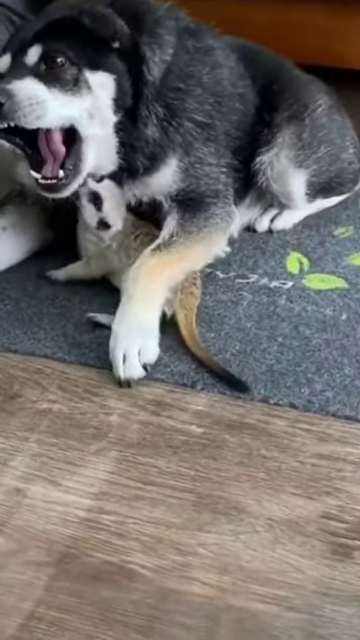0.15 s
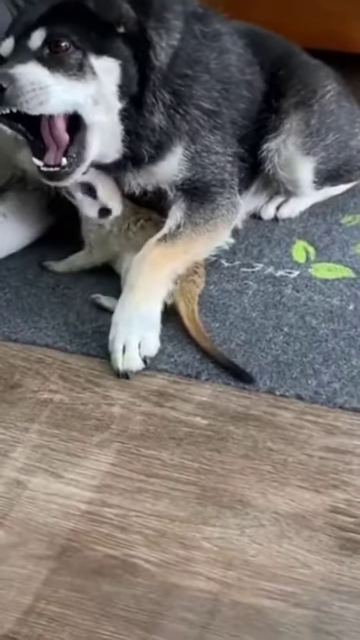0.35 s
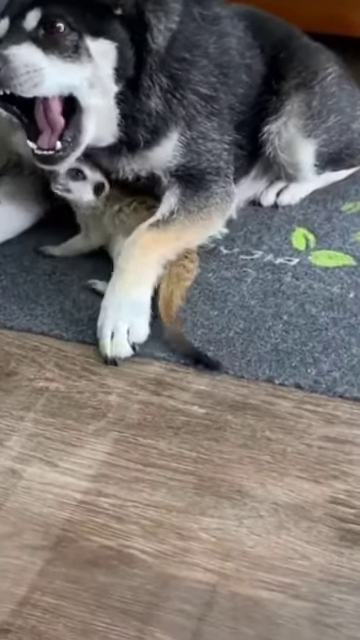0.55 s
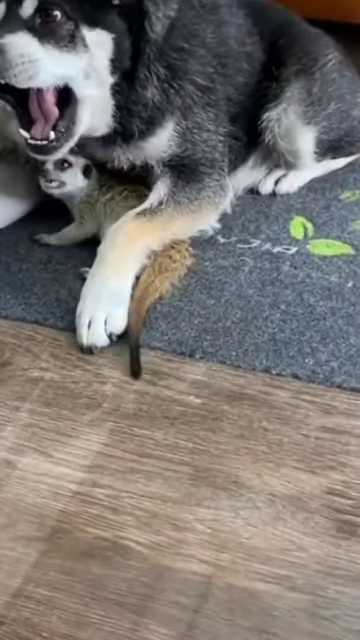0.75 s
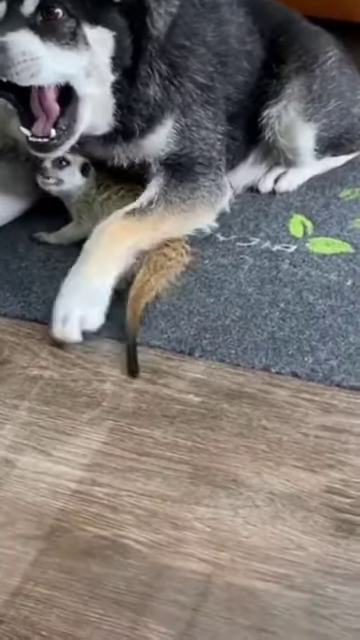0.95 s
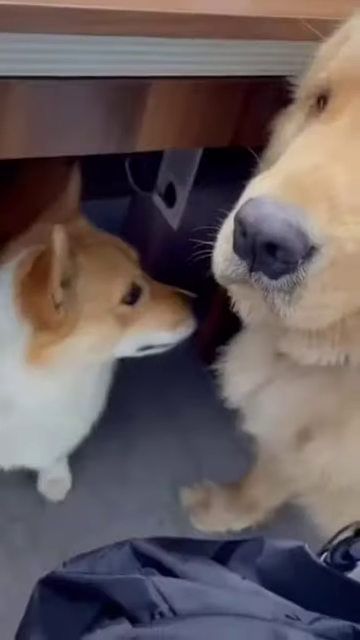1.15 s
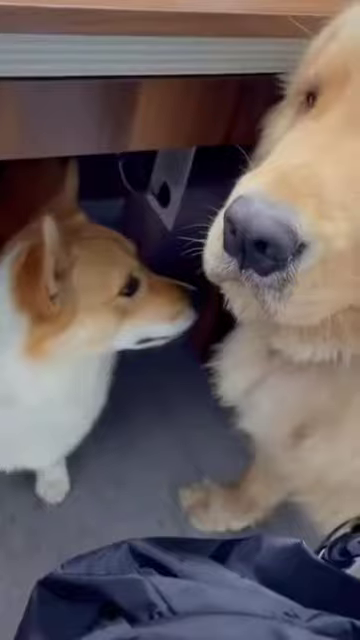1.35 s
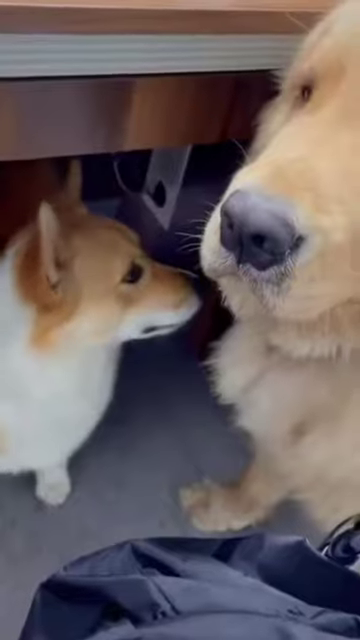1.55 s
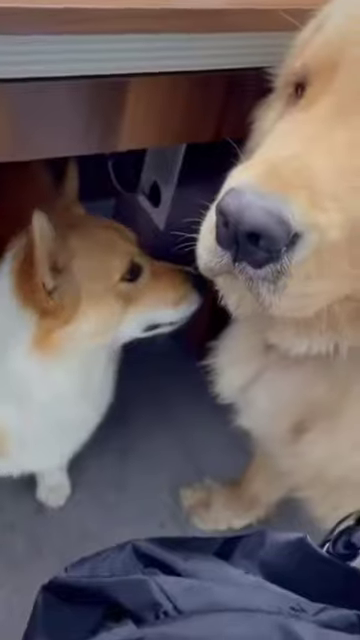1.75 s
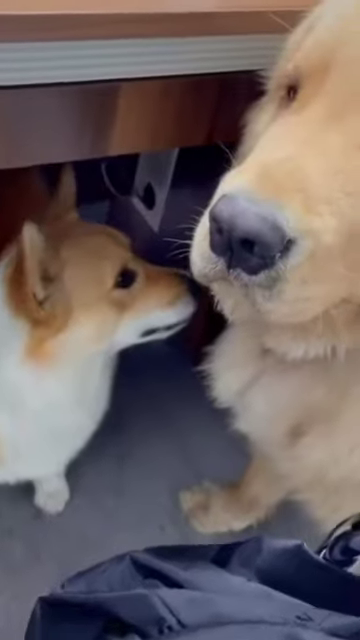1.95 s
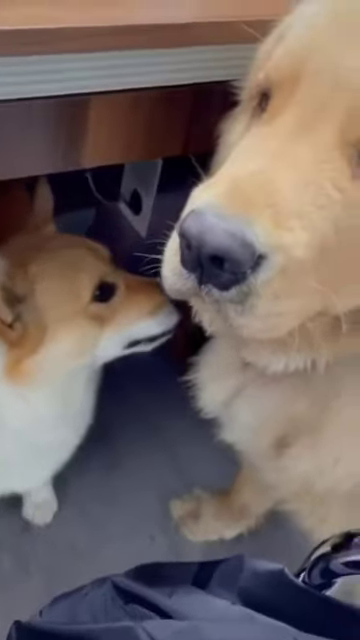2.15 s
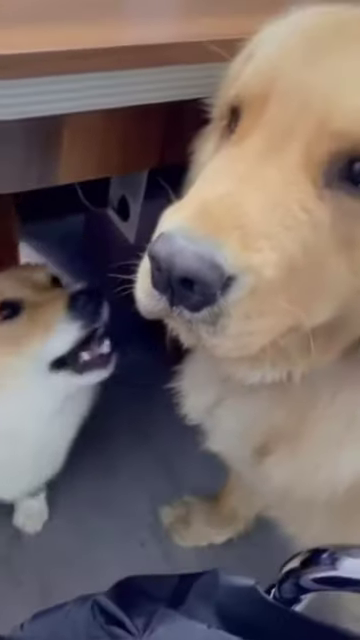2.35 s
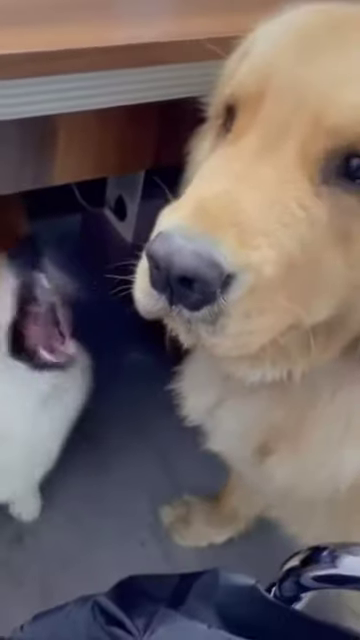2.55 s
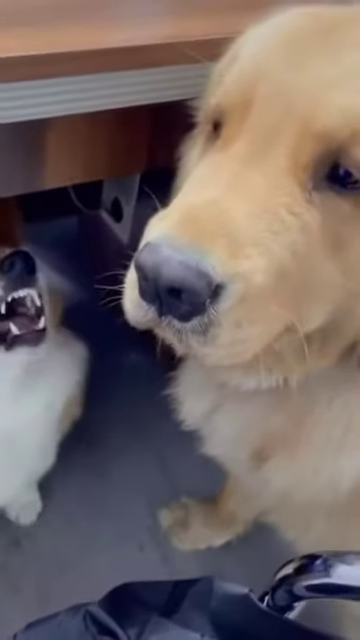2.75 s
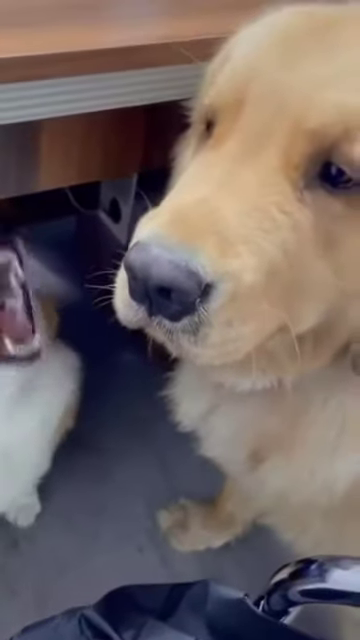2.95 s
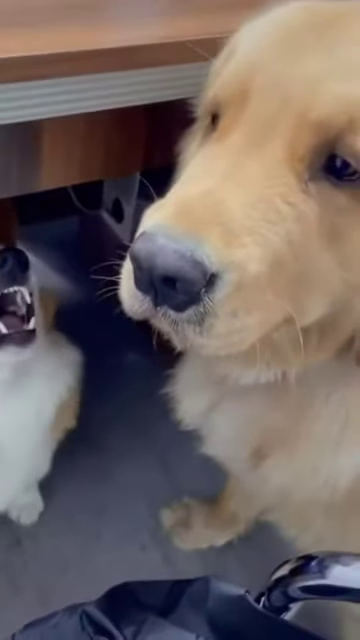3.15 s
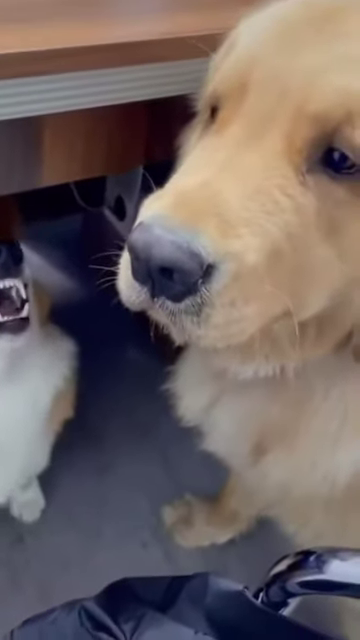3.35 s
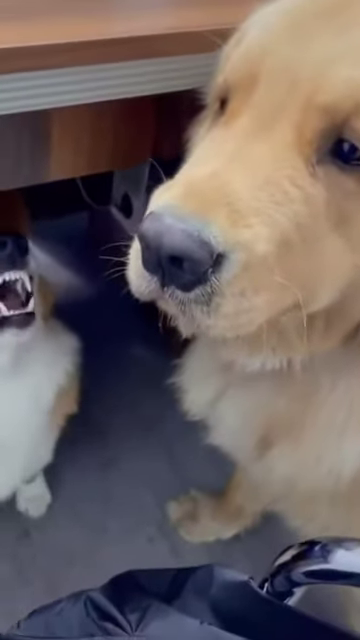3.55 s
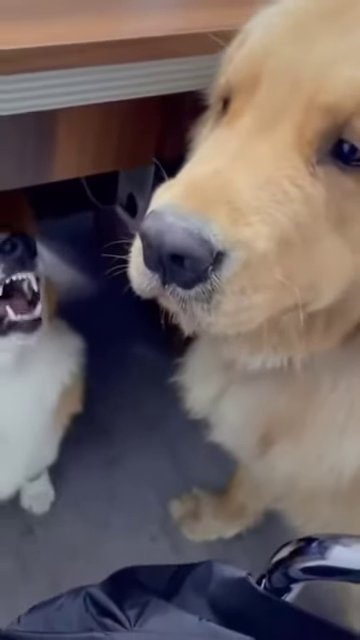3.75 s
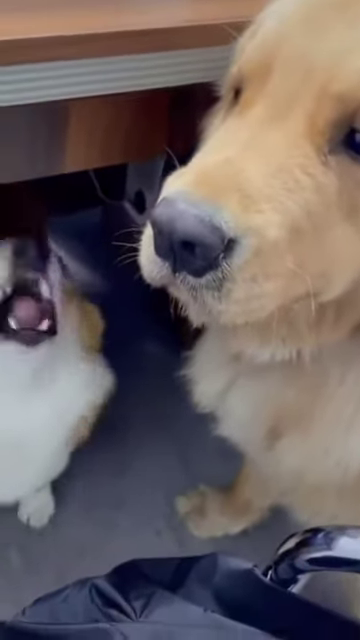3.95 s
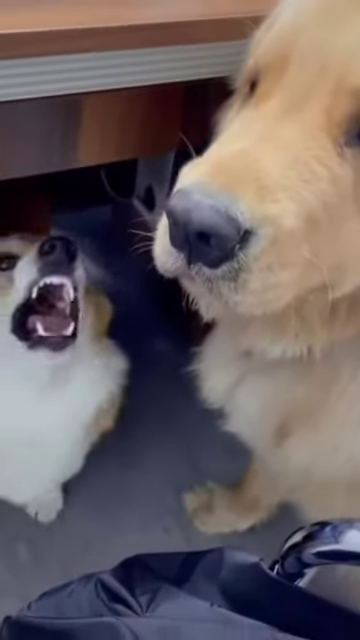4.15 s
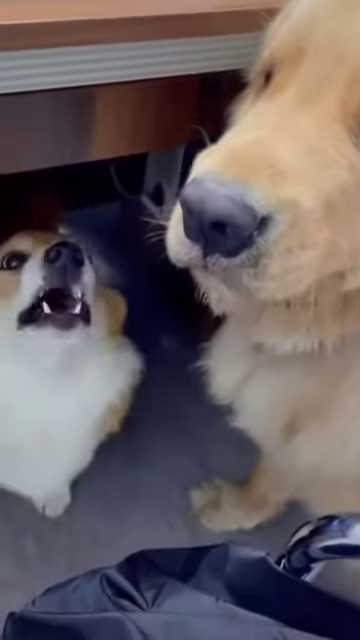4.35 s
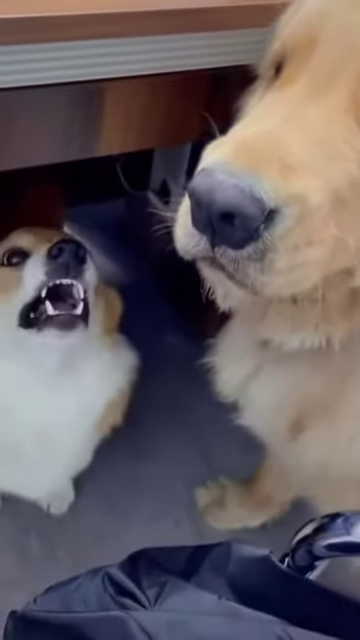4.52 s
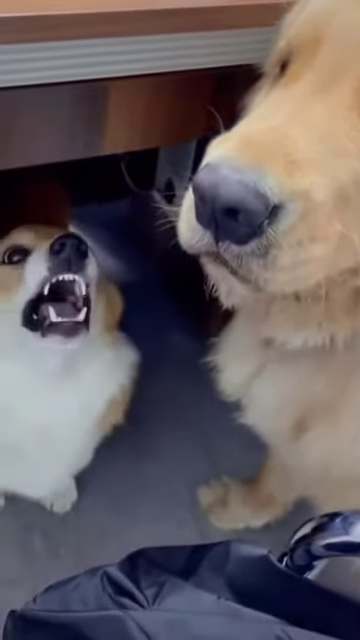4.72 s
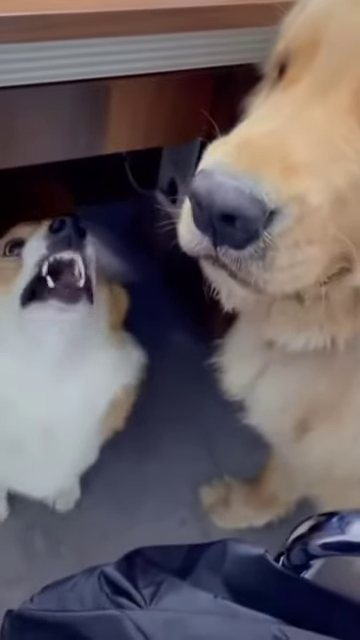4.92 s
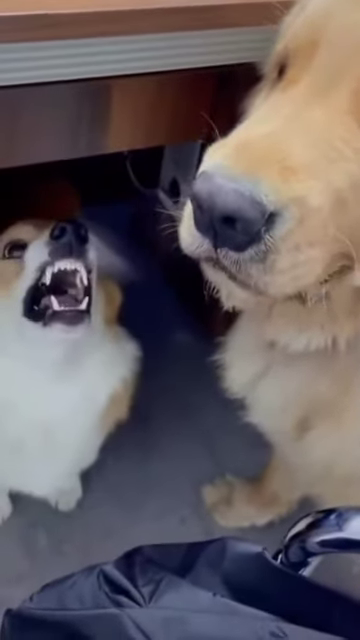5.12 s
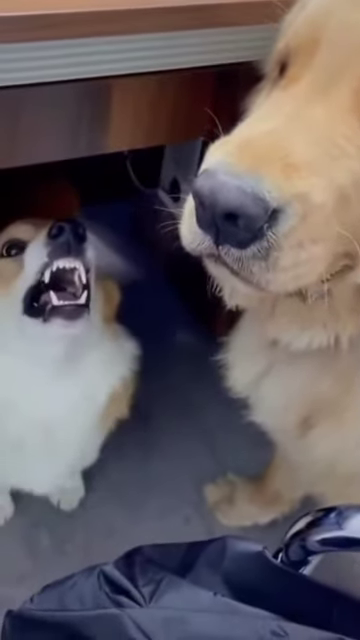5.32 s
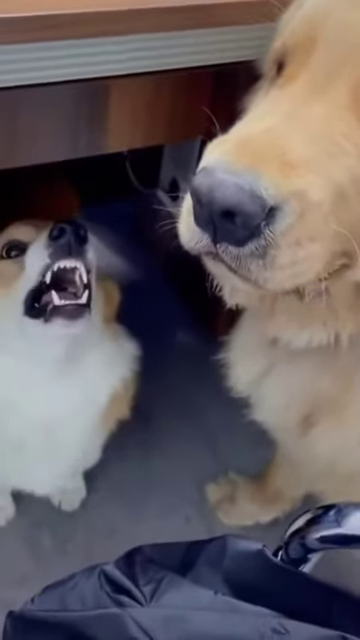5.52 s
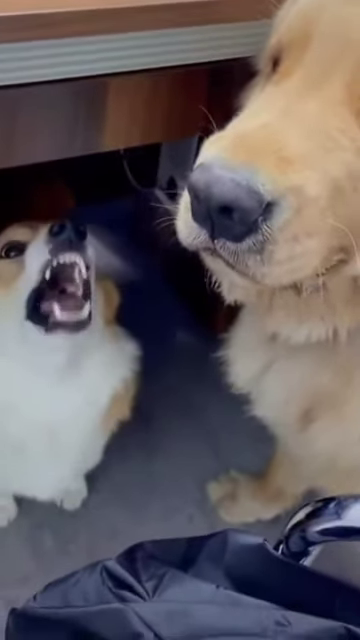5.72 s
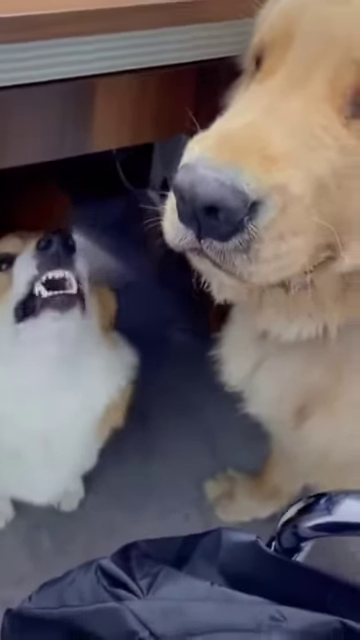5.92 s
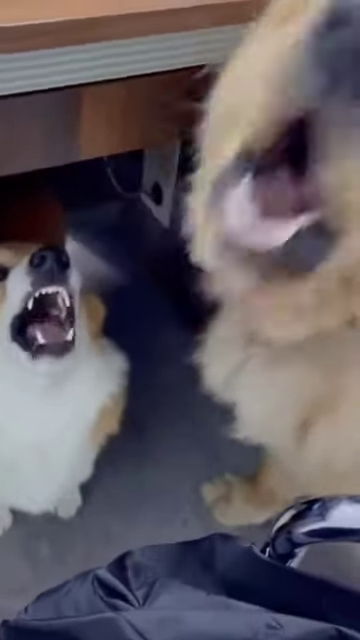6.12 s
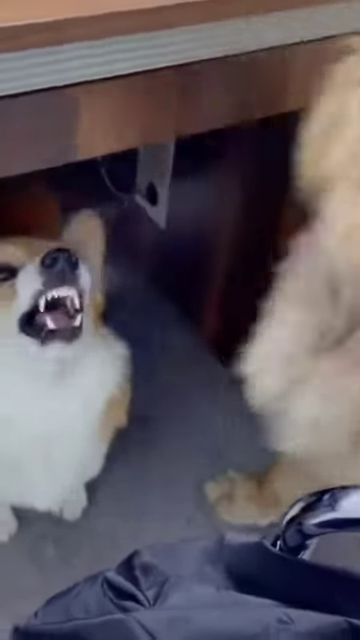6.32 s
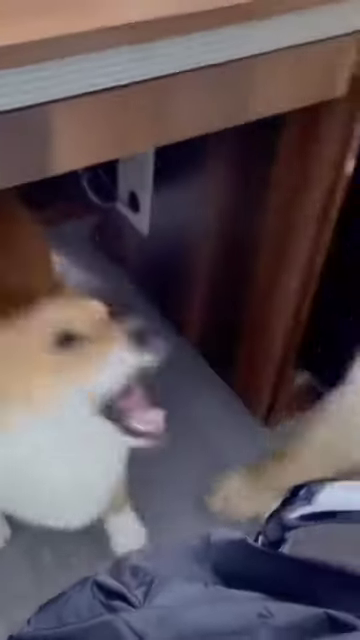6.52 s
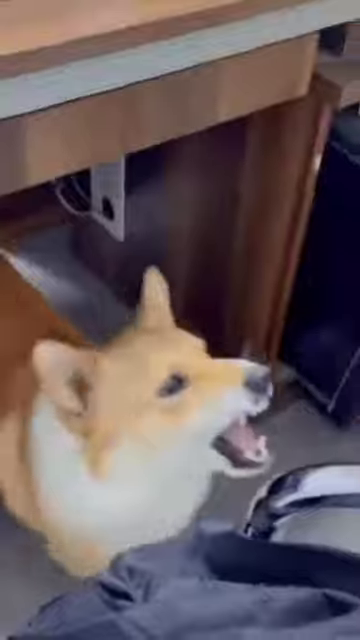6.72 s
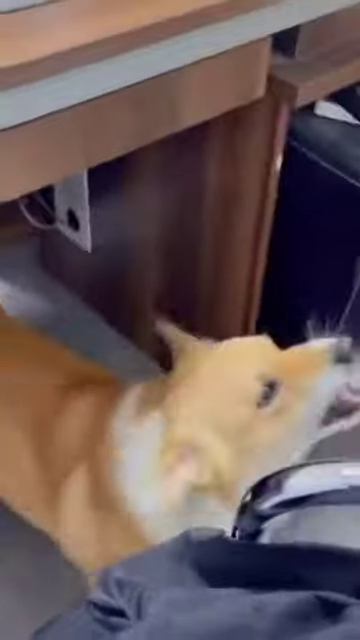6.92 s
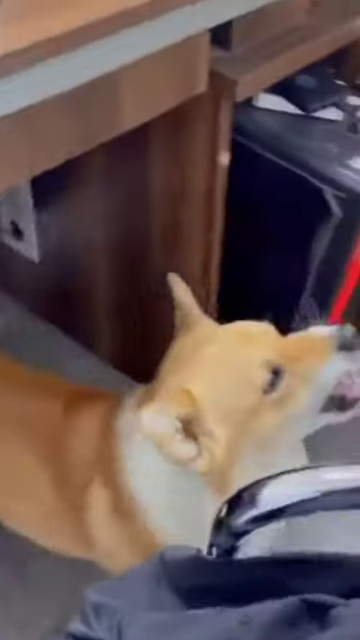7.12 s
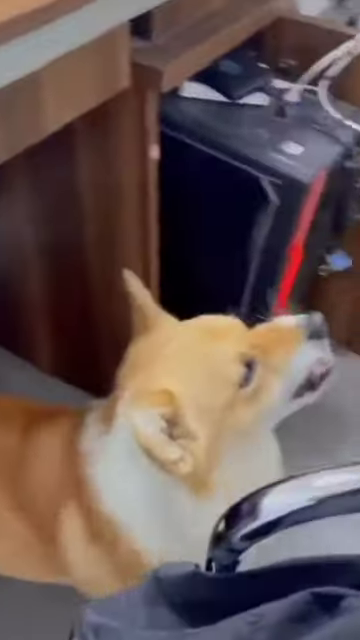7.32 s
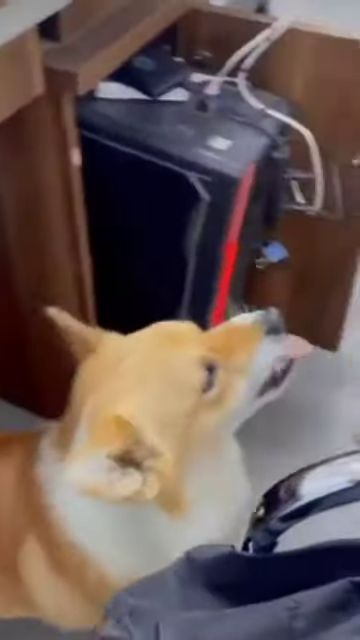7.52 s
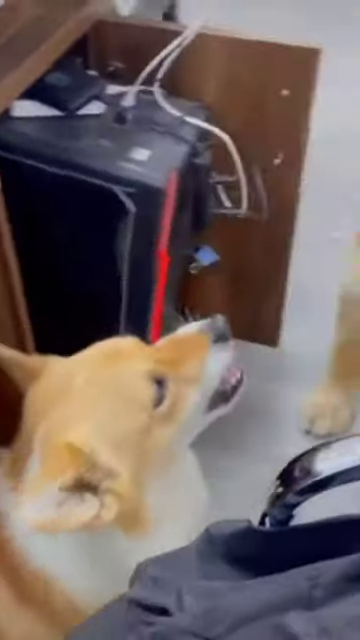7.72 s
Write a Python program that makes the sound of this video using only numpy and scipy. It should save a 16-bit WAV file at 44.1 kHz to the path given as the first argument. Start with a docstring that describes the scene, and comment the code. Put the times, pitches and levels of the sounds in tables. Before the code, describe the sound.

Rough open-mouthed dog hiss with small grunts, then a smaller dog growls, barks sharply seven times, and ends in a wobbling yowl that sinks away.

```python
"""Under an office desk, a corgi growls at a retriever, barks seven times and breaks into a wavering yowl.
Before that, a husky lets out a hoarse, open-mouthed hiss (coloured noise) with small grunts (noise puffs).
The corgi's voice is made of vocal-fold pulses sent through throat and mouth filters; the barks are sharp
arches of pitch. The desk and the room answer, and the near microphone rounds off the loudest peaks."""
import sys
import numpy as np
from scipy import signal
from scipy.fft import rfft, irfft, next_fast_len
from scipy.io import wavfile
from scipy.ndimage import uniform_filter1d, map_coordinates

SR = 44100
rng = np.random.default_rng(int(sys.argv[2]) if len(sys.argv) > 2 else 0)


def materialize(psi):
    """Save the field psi as 16-bit PCM at rate SR to the path in sys.argv[1].

    A 1-D psi becomes a single channel; in a 2-D psi each row is a channel.
    """
    bounded = np.clip(np.atleast_2d(psi).T, -1, 1)
    quanta = np.round(bounded * 32767).astype(np.int16)
    wavfile.write(sys.argv[1], SR, quanta)


N = 342657
T = np.arange(N) / SR  # time of every sample, s


def amp(db):
    """Decibels to a plain factor."""
    return 10 ** (np.asarray(db) / 20)


def unit(x):
    """x scaled to an rms of 1."""
    return x / np.sqrt(np.mean(x ** 2) + 1e-20)


def along(points, hz):
    """Read a table of (f/Hz, value) at hz, with straight lines on a log frequency axis."""
    f, v = np.transpose(points)
    return np.interp(np.log(hz + 1), np.log(f + 1), v)


def curves(rows, t=T):
    """Each column after the first, joined by straight lines and read at t."""
    s, *cols = np.transpose(rows)
    return [np.interp(t, s, c) for c in cols]


def during(rows):
    """1 while a table lasts, with short ramps at both ends."""
    return np.clip(np.minimum(T - rows[0][0], rows[-1][0] - T) / 0.0037 + 1, 0, 1)


def wobble(rate, size=N):
    """A smooth random curve through `rate` random points a second."""
    points = rng.standard_normal(int(size * rate / SR) + 4)
    return map_coordinates(points, [np.arange(size) * rate / SR])


def filtered(x, response):
    """x with each frequency multiplied by response(hz), which may be complex."""
    n = x.shape[-1]
    m = 2 * next_fast_len(n // 2 + 4096)
    return irfft(rfft(x, m) * response(np.fft.rfftfreq(m, 1 / SR)), m)[..., :n]


def causal(db):
    """The minimum-phase response with this gain: it rings after a pulse, never before it."""
    c = irfft(db * np.log(10) / 20)
    c[1:len(c) // 2] *= 2
    c[len(c) // 2 + 1:] = 0
    return np.exp(rfft(c))


def noise(spectrum):
    """Coloured noise of rms 1."""
    return unit(filtered(rng.standard_normal(N), lambda hz: amp(along(spectrum, hz))))


def steady(x, size):
    """x with its slow level brought to 1."""
    slow_power = uniform_filter1d(uniform_filter1d(x * x, size), size)
    return x / np.sqrt(np.abs(slow_power) + 1e-9)


def shifting(x, depth_db, above_hz, width_hz=170, life_s=.05):
    """Narrow bright and dull patches come and go in x, deepest well above above_hz."""
    hz, t, z = signal.stft(x, SR, nperseg=1024)
    knots = [hz[:, None] / width_hz + 0 * t, t / life_s + 0 * hz[:, None]]
    patches = unit(map_coordinates(rng.standard_normal((450, 400)), knots, order=1, mode='mirror'))
    depth = depth_db * hz ** 2 / (hz ** 2 + above_hz ** 2)
    gain = amp(depth[:, None] * np.clip(patches, -2, 2))
    gain = gain / np.sqrt(np.mean(gain ** 2, axis=1, keepdims=True))
    return signal.istft(z * gain, SR, nperseg=1024)[1][:len(x)]


def folds(pitch, rough, jitter, jitter_rate, doubling, breath, clear_hz):
    """Vocal folds: one pulse a cycle, and its phase; roughness scatters the cycles.
    Above clear_hz it also adds sidebands and puffs of air in time with the pulses."""
    n = len(pitch)
    phase = 2 * np.pi * np.cumsum(pitch * (1 + jitter * rough * wobble(jitter_rate, n))) / SR
    turn = (phase + np.pi) % (2 * np.pi) - np.pi
    orders = SR / 2 / pitch  # how many harmonics fit below half the sample rate
    pulses = np.sinc(orders * turn / np.pi) * np.cos(turn / 2) ** 2
    pulses = pulses * np.sqrt(2 * orders) - 1 / np.sqrt(2 * orders)
    # strong and weak cycles alternate, drifting in and out of step
    sidebands = doubling * pulses * np.cos(phase / 2 + 0.85 * wobble(70, n))
    air = breath * rng.standard_normal(n) * (1 + np.cos(phase))
    hoarse = filtered(rough * (sidebands + air), lambda hz: 1 - 1 / (1 + (hz / clear_hz) ** 10))
    return (pulses + hoarse) / np.sqrt(1 + rough ** 2 * (breath ** 2 + doubling ** 2 / 2)), phase


# the barks: start t/s, top of the pitch arch t/s, top pitch f/Hz, rise t/s, level/dB, opening burst level/dB,
# basic roughness [0-1], chest level/dB, brightness [dB per octave], low resonances level/dB,
# treble through the teeth level/dB
BARKS = [(2.26, 2.344, 626.3, 0.084, -14.5, -1, .55, 9, 0.5, -0.5, -3.5),
         (2.571, 2.649, 636.4, 0.084, -13, 8, 0, -3.5, -2, -4, 0),
         (2.979, 3.072, 618, .084, -13.5, 9, .3, -3, -.5, 1.5, 1),
         (3.921, 3.998, 631, 0.077, -13, 5, .3, 3, 0.5, -7.5, -.5),
         (4.259, 4.366, 634.2, .092, -13.5, 9.5, .4, 2, 1, 2.5, -1.5),
         (4.844, 4.944, 639.3, 0.089, -13, 9, 0, -7, 0, 3.5, 1),
         (5.733, 5.879, 631.2, 0.093, -13.5, 6, .42, 3, 0, -2, 4)]
# the wide open mouth: f/Hz, level/dB
MOUTH = [(120, -39), (300, -7.5), (600, -9), (1100, -1.5), (1800, -1.5), (2600, -5.5), (3200, -13.5),
         (3800, -21.5), (4400, -33), (5500, -30.5), (6600, -22), (7200, -26.5), (7600, -48), (9200, -37.5),
         (15500, -52.5)]
# resonances of the throat and the hollow under the desk: centre f/Hz, width f/Hz, level/dB
HOLLOW = [(723, 90, 3.5), (854, 80, 7), (1607, 66, 8.5), (2150, 57, -1), (2640, 61, -13.5), (3144, 25, -1),
          (4970, 57, 1.5), (5650, 69, -2), (6270, 35, 3), (6760, 37, -5)]
# first reflections from the floor and the desk panels: delay t/s, level/dB
PANELS = [(.0016, -13.5), (.0033, -24.5), (.0057, -16.5), (.0094, -28)]
BARK_FALL_S = .076  # the pitch falls to about a third in this time
STRAIN, BURST_ROUGH = 0.27, .32  # added roughness: at the feet of the arch; while the pressure peaks
RINGING_DB = 1.5  # added to every resonance


def barks():
    """Each bark sweeps its harmonics up and down through fixed resonances, clearest at the top of the arch."""
    out = np.zeros(N)
    t = np.arange(-SR // 5, SR // 5) / SR  # 0 at the top of the arch
    for start, s, top_hz, rise, db, burst_db, rough, chest_db, bright_db, low_db, teeth_db in BARKS:
        u = t / np.where(t < 0, rise, BARK_FALL_S)
        pitch = np.maximum(top_hz * np.exp(-np.abs(u) ** 2.3), 180)
        effort_db = bark_effort(u)
        # while the pitch is still climbing, the pressure peaks, tears the voice and drives the resonances
        peak = np.exp(-((u + 0.43) / .14) ** 2)
        burst = burst_db * peak
        rough = np.clip(rough + STRAIN * np.minimum(u * u, 1) + BURST_ROUGH * np.sqrt(peak), 0, 1)
        source = folds(pitch, rough, jitter=.055, jitter_rate=330, doubling=1.05, breath=.45, clear_hz=680)[0]
        source *= amp(effort_db) * np.clip((s + t - start) / 0.028, 0, 1)
        # weak effort closes the folds softly, so the start and the end are duller; rough closure flickers
        soft = filtered(source, lambda hz: 1 / (1 + (hz / 1100) ** 2))
        flicker_db = (1.5 + 3 * rough) * wobble(55, len(t))
        bright_gain = amp(1.8 * np.minimum(effort_db, 0) + 0.34 * burst + flicker_db)
        source = soft + (source - soft) * bright_gain
        # the winding throat spreads each pulse over a few milliseconds
        source = filtered(source, lambda hz: np.exp(-2j * np.pi * .006 * (hz - 2500 * np.log1p(hz / 2500))))

        def hollow(hz):
            total = 0
            for centre, width, level_db in HOLLOW:
                # the tongue and jaw feed the low resonances more or less from bark to bark
                gain = amp(level_db + low_db * (centre < 1000))
                total = total + gain * 1j * hz * width / (centre * centre - hz * hz + 1j * hz * width)
            return total

        def mouth(hz):
            chest = chest_db / (1 + (hz / 900) ** 4)
            tilt = bright_db * np.log2(np.clip(hz, 400, 8000) / 1500)
            teeth = teeth_db * (1 - 1 / (1 + (hz / 3000) ** 8))
            return causal(along(MOUTH, hz) + chest + tilt + teeth)

        def panels(hz):
            return 1 + sum(amp(g) * np.exp(-2j * np.pi * hz * delay) for delay, g in PANELS)

        ringing = filtered(source * amp(burst + RINGING_DB), hollow)
        bark = filtered(source + ringing, lambda hz: mouth(hz) * panels(hz))
        # the level is set over the middle of the bark
        out[round(s * SR) - SR // 5:][:len(t)] += amp(db) * bark / np.std(bark[np.abs(t) < .06])
    return out


# timed in rise or fall lengths from the top: full effort is reached; the throat closes; how long that takes
FULL_BEFORE, CLOSE_AFTER, CLOSE_LENGTH = 0.73, 0.95, 0.11
ATTACK_DB, SAG_DB, CLOSE_DB, FADE_DB = 36, 15, 9.5, 13  # per length; sag until closing; drop at it; per length after


def bark_effort(u):
    """Effort in dB along the arch: a fast attack, a sag past the top, a sudden closing and a fade."""
    climb = 3.2 * np.clip(1 + u, 0, 1)
    attack = ATTACK_DB * np.maximum(-u - FULL_BEFORE, 0)
    sag = SAG_DB * np.clip(u / CLOSE_AFTER, 0, 1) ** 2
    closing = CLOSE_DB * np.clip((u - CLOSE_AFTER) / CLOSE_LENGTH, 0, 1)
    fade = FADE_DB * np.maximum(u - CLOSE_AFTER, 0)
    return climb - attack - sag - closing - fade


# pitch of the yowl: t/s, f/Hz
YOWL_PITCH = [(6.04, 140.8), (6.112, 339.2), (6.184, 522.8), (6.24, 580.8), (6.302, 449.2), (6.352, 445.4),
              (6.424, 556.8), (6.464, 537.5), (6.536, 396.4), (6.564, 395.5), (6.7, 555.2), (6.762, 457.7),
              (6.844, 426.6), (6.924, 561), (7.114, 468.6), (7.154, 520.5), (7.22, 476)]
# the half-closed mouth: f/Hz, level/dB
YOWL_MOUTH = [(480, -33.5), (760, 1), (930, 2.5), (1300, -7), (1700, 0), (2000, -17), (2280, -12),
              (2550, -25), (4000, -31.5), (8000, -64.5)]
# colour of the rasp in the snarls: f/Hz, level/dB
RASP = [(1530, -16.5), (2500, -18.5), (3100, -2.5), (3860, -7.5), (4230, -7.5), (6090, -10.5), (6870, -25),
        (7970, -46.5), (8720, -22.5), (12800, -37.5), (14600, -42), (15500, -33)]
RASP_DB, RASP_GROWS = -16, 1.28  # rasp when the overtones are at 0 dB; dB of rasp per dB of overtones
DULL_BELOW_DB, DULL_HZ = -22.5, 1200  # overtones weaker than this lose strength above this frequency
YOWL_RELEASE_S = 0.13  # the voice fades over this time, the overtones sooner than the tone


def yowl():
    """A strong, clean fundamental whose overtones tear into a snarl on the swells."""
    low_db, over_db, rough, jaw = swells()
    pitch = uniform_filter1d(curves(YOWL_PITCH)[0], size=700)
    source, phase = folds(pitch, rough, jitter=.085, jitter_rate=250, doubling=1.7, breath=.75, clear_hz=650)
    # loose tissue rattles and shakes all of the voice together
    rattle_db = rough * wobble(160)
    fundamental = np.sin(phase) * np.sqrt(2) * amp(4 * rattle_db)

    def through(mouth):
        shaken = source * amp(5 * rattle_db)
        return steady(filtered(shaken, lambda hz: causal(along(mouth, hz))), size=900)

    # an open jaw gives the overtones the colour of a bark; a weak voice is duller
    overtones = steady((1 - jaw) * through(YOWL_MOUTH) + jaw * through(MOUTH), size=900)
    dull = filtered(overtones, lambda hz: 1 / (1 + (hz / DULL_HZ) ** 8))
    overtones = dull + (overtones - dull) * amp(np.minimum(over_db - DULL_BELOW_DB, 0))
    # the rasp mixes pulsing air with the rough pulses themselves
    raspy_air = unit(noise(RASP) * (1 + .3 * np.cos(phase)))
    raspy_pulses = unit(filtered(source, lambda hz: causal(along(RASP, hz))))
    rasp = unit(raspy_air + 1.2 * raspy_pulses) * amp(3.97 * rattle_db)
    # the voice swells as it climbs, and only then do the overtones and the rasp set in
    fundamental = fundamental * np.clip((pitch - 120) / 220, 0, 1) ** 2
    upper = amp(over_db) * overtones + amp(RASP_DB + RASP_GROWS * over_db) * rasp
    upper = np.clip((pitch - 230) / 130, 0, 1) * upper
    start, end = YOWL_PITCH[0][0], YOWL_PITCH[-1][0]
    sounding = np.interp(T, [start, end, end + YOWL_RELEASE_S], [1, 1, 0], left=0)
    return sounding * amp(low_db) * fundamental + sounding ** 4 * upper


# swells of the yowl, each a snarl and then a clear tone: start t/s, snarl hold t/s, snarl level/dB,
# release [dB per s], roughness [0-1], jaw opening [0-1], tone's delay t/s, tone's half length t/s, tone level/dB
SWELLS = [(6.105, .008, -12.5, 160.5, .2, 0.17, 0.078, 0.041, -6.5),
          (6.327, .08, -23.5, 300.5, .28, 0, 0.089, 0.056, -13.5),
          (6.524, 0.052, -17, 114.5, 0.5, 0.2, 0.14, 0.072, -16.5),
          (6.836, .075, -16, 223.5, .55, 0.3, 0.1, 0.083, -18)]
SWELL_ATTACK_S, SWELL_ATTACK_DB = .05, 25  # a snarl climbs this far in this time
HELD_TONE_DB, HELD_OVERTONES_DB, HELD_ROUGH = -31, -32, 0.027  # the voice between swells
YOWL_FADE_S, YOWL_FADE_DB_PER_S = 7.057, 51.5  # when the held voice starts to die away, and how fast


def swells():
    """The yowl's tone and overtone levels in dB, roughness and jaw opening: swells on top of a held voice."""
    held = amp(-YOWL_FADE_DB_PER_S * np.maximum(T - YOWL_FADE_S, 0))
    tone, over = amp(HELD_TONE_DB) * held, amp(HELD_OVERTONES_DB) * held
    rough, jaw = HELD_ROUGH, 0
    for start, hold, snarl_db, release, roughness, opening, delay, half, tone_db in SWELLS:
        t = T - start
        attack_db = SWELL_ATTACK_DB * np.minimum(t / SWELL_ATTACK_S - 1, 0)
        shape_db = attack_db - release * np.maximum(t - SWELL_ATTACK_S - hold, 0)
        over = np.hypot(over, amp(snarl_db + shape_db))
        tone = np.hypot(tone, amp(tone_db) * np.exp(-((t - delay) / half) ** 2))
        # roughness comes in faster than the level and leaves more slowly
        rough = rough + roughness * amp(np.where(t < SWELL_ATTACK_S, 1.2, .4) * shape_db)
        jaw = jaw + opening * amp(.4 * shape_db)
    return 20 * np.log10(tone), 20 * np.log10(over), np.clip(rough, 0, 1), np.clip(jaw, 0, 1)


# the growl through bared teeth between barks: t/s, pitch f/Hz, level/dB
TEETH = [(2.68, 94.6, -55.5), (2.93, 76.1, -51.5), (3.12, 110.3, -49.5), (3.6, 107.3, -56),
         (4.1, 110.4, -53), (4.22, 122.4, -44.5), (4.45, 120.3, -50.5), (4.58, 124.2, -40.5),
         (4.8, 130.3, -43), (5.1, 134.6, -54), (5.3, 130, -89.5)]
# the growl that the yowl sinks into: t/s, pitch f/Hz, level/dB
GRUMBLE = [(6.98, 439.7, -34.5), (7.1, 226.2, -44.5), (7.2, 194.8, -45), (7.27, 133, -61.5),
           (7.77, 120.9, -67)]
# how tense the growl between barks is at each pitch: f/Hz, roughness [0-1], mouth opening [0-1]
TENSION = [(108.7, 0.2, .12), (119.4, .13, .7), (129.3, 0.7, 0.6)]


def growls():
    """Between the barks, the growl's pitch sets its roughness and opening; after the yowl it is slack."""
    rough, opening = curves(TENSION, curves(TEETH)[0])
    return growl(TEETH, rough, opening) + growl(GRUMBLE, rough=0.48, opening=0.16)


# the throat behind bared teeth: f/Hz, level/dB
TEETH_THROAT = [(60, -29), (115, -7), (230, -4), (370, 1), (490, 0), (620, -11.5), (900, -13), (1300, -36),
                (2200, -26.5), (4000, -42.5), (12000, -74)]


def growl(rows, rough, opening):
    """A chest hum that gains overtones as the lips draw back."""
    pitch, db = curves(rows)
    rough = np.clip(rough, 0, 1)
    source, phase = folds(pitch, rough, jitter=.1, jitter_rate=70, doubling=.7, breath=1, clear_hz=180)
    overtones = steady(filtered(source, lambda hz: causal(along(TEETH_THROAT, hz))), size=2000)
    voice = steady(np.cos(phase) + 3.6 * opening * overtones, size=2000)
    return during(rows) * amp(db + 1.3 * wobble(18)) * voice


# the closed-mouth growl: t/s, pitch f/Hz, level/dB
GROWL = [(1.25, 76.3, -54.5), (1.452, 78, -54), (1.732, 97.5, -48.5), (1.778, 105.6, -51),
         (1.916, 104.7, -50), (2.1, 95, -48), (2.17, 99, -53.5), (2.22, 100.8, -70)]
# the closed throat: f/Hz, level/dB
GROWL_THROAT = [(40, -22), (80, 5.5), (140, -5.5), (205, 7.5), (290, -10.5), (400, 3), (500, -8),
                (620, -10), (760, -33), (1100, -31), (1600, -39.5), (2300, -29), (3000, -47.5), (3900, -35),
                (6000, -52.5), (12000, -82)]


def warning_growl():
    """Slow, even pulses through a dark, closed throat, with a little air on top."""
    pitch, db = curves(GROWL)
    source = folds(pitch, .12, jitter=.12, jitter_rate=60, doubling=.5, breath=8, clear_hz=950)[0]
    voice = steady(filtered(source, lambda hz: causal(along(GROWL_THROAT, hz))), size=2000)
    return during(GROWL) * amp(db) * voice


# colour of the spit: f/Hz, level/dB
SPIT = [(290, -29.5), (500, -1), (608, -6.5), (886, -5.5), (1350, -21), (1960, -5), (2860, -33),
        (3280, -18.5), (4220, -26.5), (4460, -51), (6880, -35), (14000, -62)]
SPIT_S, SPIT_HALF_S, SPIT_DB = 4.77, 0.038, -38  # middle, half length, level at the middle


def spit():
    """A brief rasp of air through the corgi's teeth: one short swell of coloured noise."""
    return amp(SPIT_DB) * np.exp(-((T - SPIT_S) / SPIT_HALF_S) ** 2) * noise(SPIT)


# the husky's hiss: t/s, level/dB
HISS = [(0.0, -47), (0.032, -38), (0.104, -37.5), (0.244, -61.5), (0.332, -50), (0.594, -27),
        (0.754, -35.5), (0.858, -32.5), (0.872, -27), (1.015, -29)]
# colour of the rushing air: f/Hz, level/dB
AIR = [(120, -54), (200, -19), (281, -6), (342, -20.5), (508, -7), (556, -15), (714, -5.5), (824, -11.5),
       (1410, -10), (2250, -11), (2550, -8.5), (2890, -10.5), (5920, -10), (7470, -26.5), (14500, -44.5)]
# colour of the low rumble: f/Hz, level/dB
RUMBLE = [(13, -27), (22, 3), (92, 6.5), (157, -1.5), (230, -2), (260, -8), (340, -11), (570, -120)]
RUMBLE_DB, RUMBLE_FOLLOWS = -35.5, 0.32  # rumble when the air is at 0 dB; dB of rumble per dB of air


def hiss():
    """Air rushes through the husky's open jaws, wide in stereo, over a low rumble that swells with it."""
    air_db, = curves(HISS)
    rumble_db = RUMBLE_DB + RUMBLE_FOLLOWS * air_db
    air = shifting(noise(AIR), depth_db=3.5, above_hz=330, width_hz=90)
    mid = amp(air_db + 0.97 * wobble(45)) * air + amp(rumble_db) * noise(RUMBLE)
    # separate noise, added on the left and subtracted on the right
    side = amp(air_db - 2.5) * noise(AIR) + amp(rumble_db - 5.0) * noise(RUMBLE)
    ending = np.interp(T, [HISS[-1][0], HISS[-1][0] + .014], [1, 0])
    return ending * np.array([mid + side, mid - side])


# the husky's grunts: t/s, half length t/s, resonance f/Hz, level/dB
GRUNTS = [(.038, 0.02, 693, -31.5), (.04, 0.016, 364, -33.5), (.045, 0.023, 239, -31.5),
          (.61, .018, 440, -38), (.675, .022, 698, -27.5), (.93, 0.012, 750, -24)]
# soft low bumps: t/s, half length t/s, centre f/Hz, level/dB
BUMPS = [(.04, .02, 70, -33), (.95, .03, 90, -37), (2.87, 0.053, 150, -44), (2.91, .06, 52.3, -44.5),
         (6.205, .022, 141, -42.5)]
GRUNT_WIDTH, BUMP_WIDTH = .12, 1.6  # bandwidth over centre frequency


def puffs(rows, width):
    """Each is a short swell of noise in one resonance."""
    out = np.zeros(N)
    t = np.arange(-SR // 5, SR // 5) / SR
    for s, length, hz, db in rows:
        band = filtered(rng.standard_normal(len(t)), lambda f: 1 / (1 + (2 * (f - hz) / (width * hz)) ** 2))
        swell = np.exp(-(t / length) ** 2)
        puff = amp(db) * unit(band * swell) * np.sqrt(np.mean(swell ** 2))
        out += np.interp(T, s + t, puff, 0, 0)
    return out


def desk(x):
    """Dense, short reflections from the panels around the dog."""
    t = np.arange(SR // 8) / SR
    slap = rng.standard_normal(len(t)) * amp(-60 * t / 0.16) * (t > .006)
    return signal.fftconvolve(x, slap / np.linalg.norm(slap))[:N]


# how long the office takes to die away by 60 dB: f/Hz, t/s
ROOM = [(150, 0.55), (500, 0.5), (1500, 0.53), (3500, 0.68), (7000, 0.39), (14000, 0.4)]


def room(x):
    """The office's tail: noise in which each frequency dies at its own speed."""
    hz, t, z = signal.stft(rng.standard_normal(SR), SR, nperseg=256)
    tail = signal.istft(z * amp(-60 * t / along(ROOM, hz)[:, None]), SR, nperseg=256)[1]
    # colour of the tail: f/Hz, level/dB
    colour = [(200, 8.5), (600, 2.0), (3000, -7), (4500, -4.0), (12000, 0.5)]
    tail = filtered(unit(tail), lambda f: amp(along(colour, f)))
    delayed = np.pad(tail, (300, 0))  # samples of silence first
    return signal.fftconvolve(x, delayed / np.sqrt(len(tail)))[:N]


# colour of the office's background noise: f/Hz, level/dB
FLOOR = [(20, -20.5), (50, -4.5), (86, -13.5), (125, -6), (200, -11), (520, -27), (1100, -36),
         (5000, -40.5), (15000, -59)]


def office_floor():
    """The quiet office: faint, steady coloured noise that starts with the first growl."""
    return amp(-65.0) * noise(FLOOR) * (T > GROWL[0][0])


def scene():
    """The corgi is dead ahead in the quiet office; the husky's hiss, the grunts and the bumps join it."""
    voice = barks() + yowl() + warning_growl() + growls() + spit()
    voice = shifting(voice, depth_db=7.0, above_hz=2100)
    near = voice + amp(-12) * desk(voice)
    office = near + amp(-14.5) * room(voice) + office_floor()
    return hiss() + puffs(GRUNTS, GRUNT_WIDTH) + puffs(BUMPS, BUMP_WIDTH) + office


TOP_HZ = 15750  # the microphone's band limit


def record(dry):
    """The microphone rounds off the highest peaks and keeps nothing above its band limit."""
    rounded = dry / (1 + np.abs(dry) ** 8) ** (1 / 8)
    return filtered(rounded, lambda hz: hz < TOP_HZ)


dry = scene()
out = record(dry)
materialize(out)
```